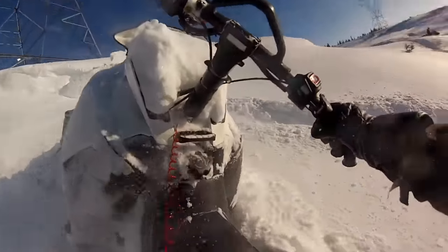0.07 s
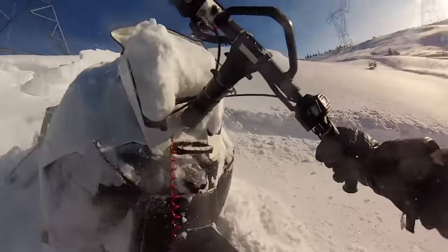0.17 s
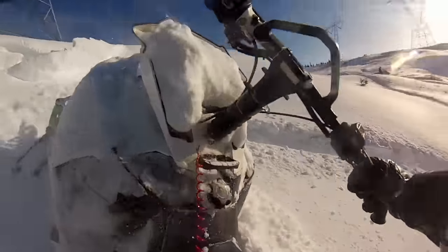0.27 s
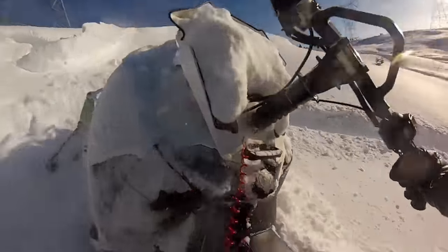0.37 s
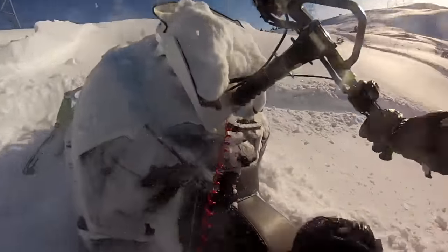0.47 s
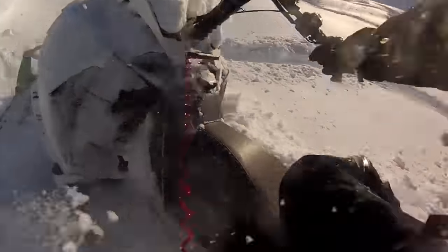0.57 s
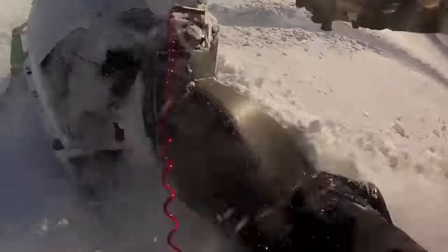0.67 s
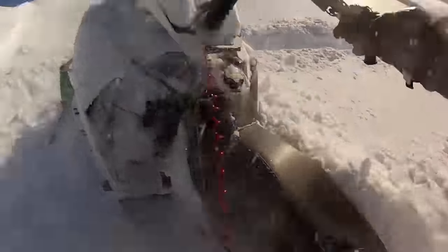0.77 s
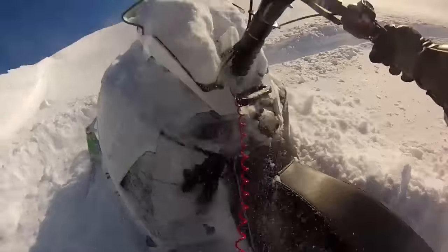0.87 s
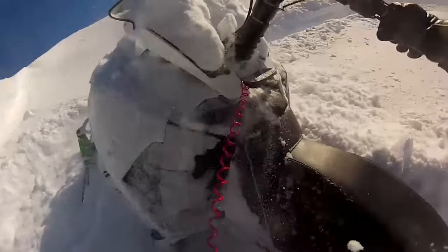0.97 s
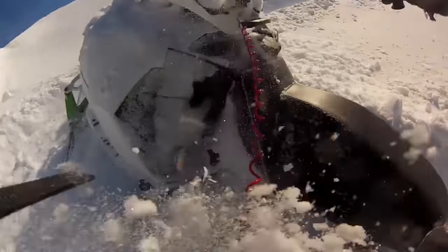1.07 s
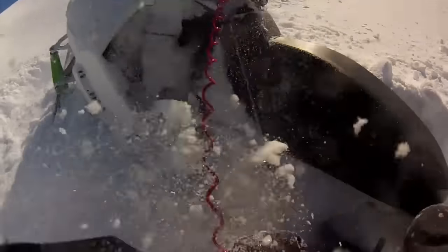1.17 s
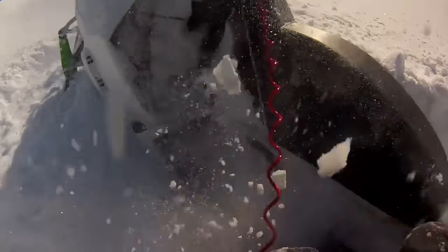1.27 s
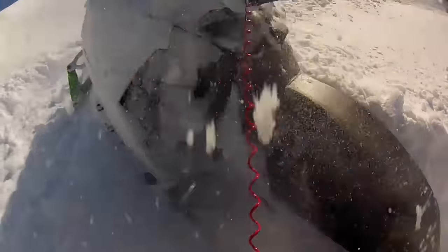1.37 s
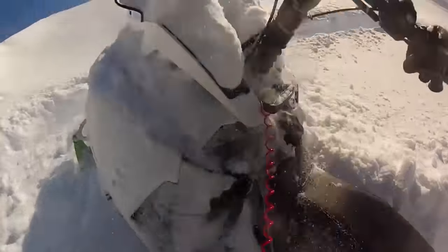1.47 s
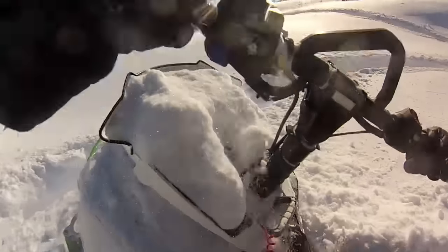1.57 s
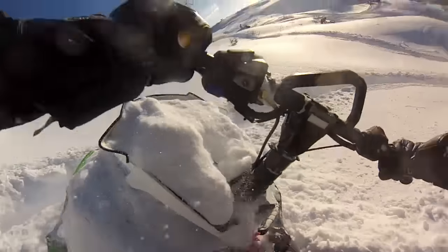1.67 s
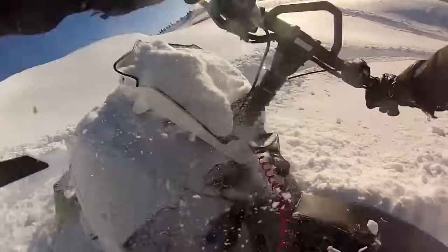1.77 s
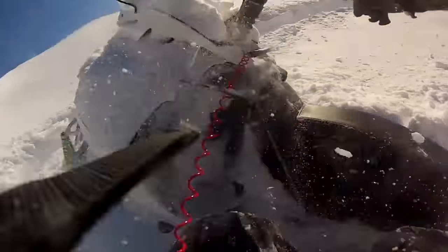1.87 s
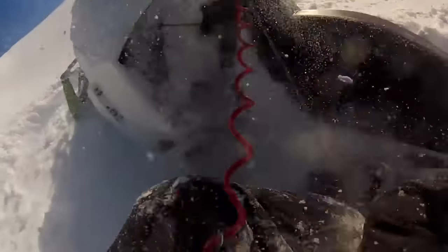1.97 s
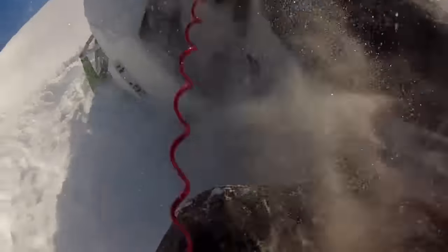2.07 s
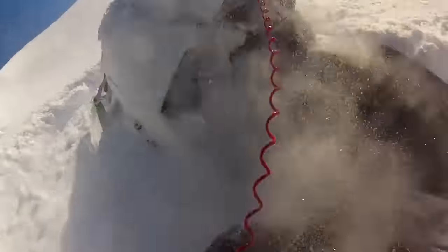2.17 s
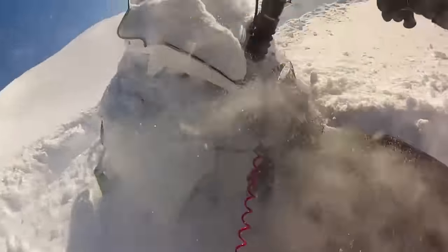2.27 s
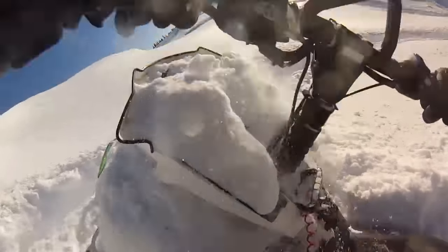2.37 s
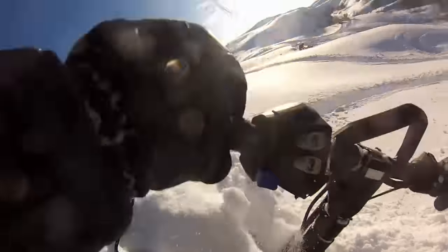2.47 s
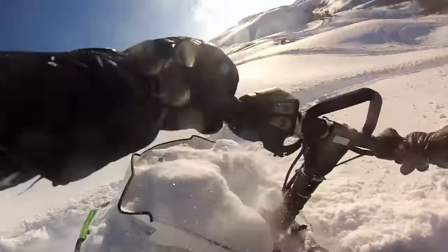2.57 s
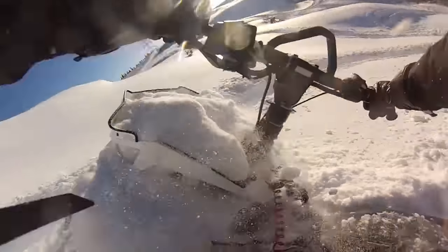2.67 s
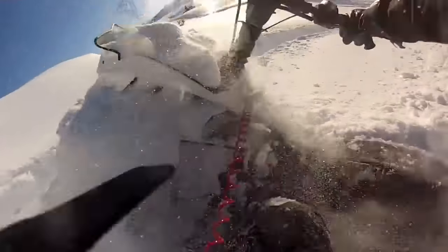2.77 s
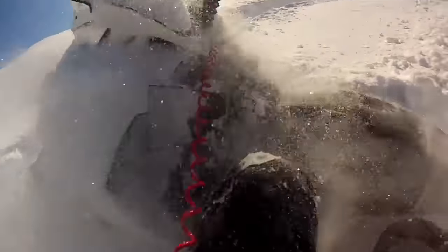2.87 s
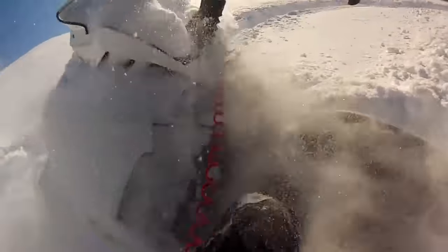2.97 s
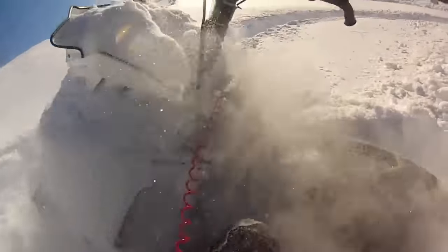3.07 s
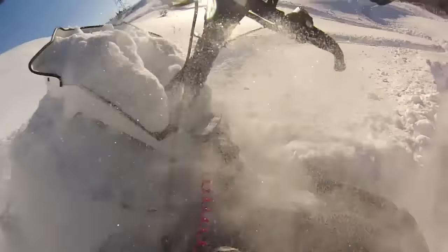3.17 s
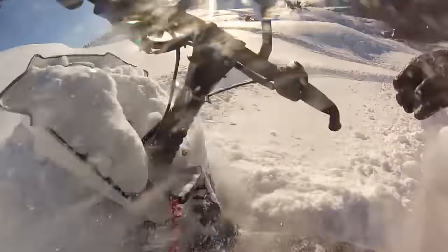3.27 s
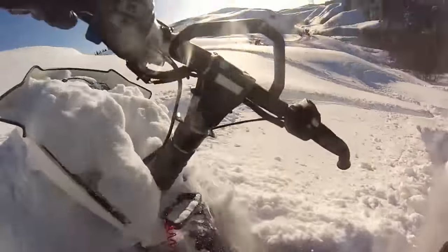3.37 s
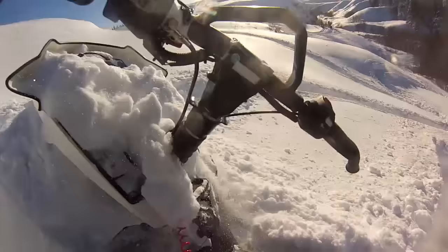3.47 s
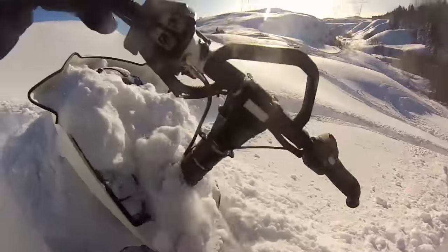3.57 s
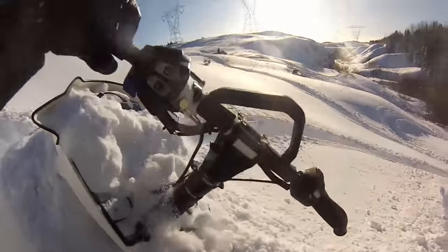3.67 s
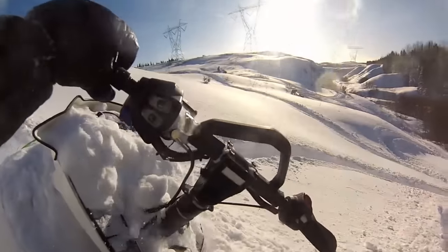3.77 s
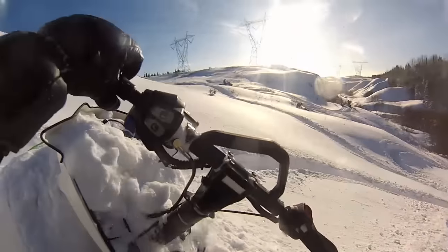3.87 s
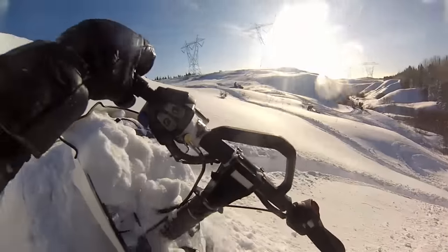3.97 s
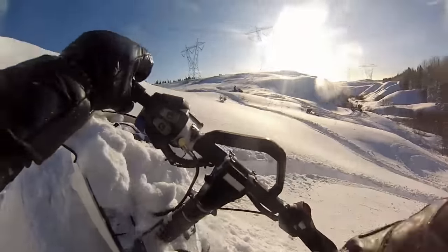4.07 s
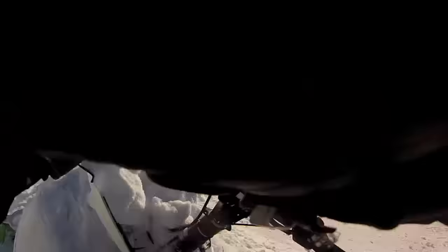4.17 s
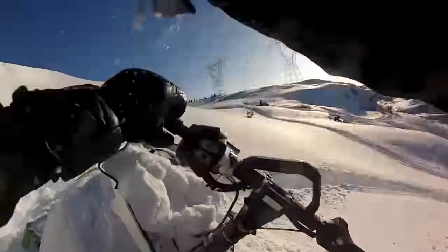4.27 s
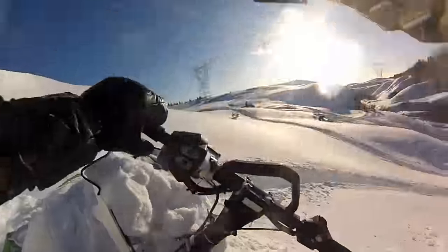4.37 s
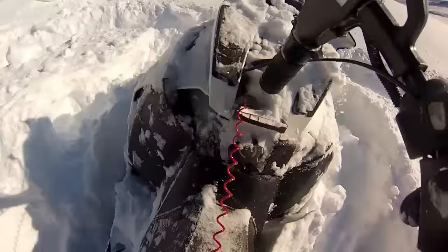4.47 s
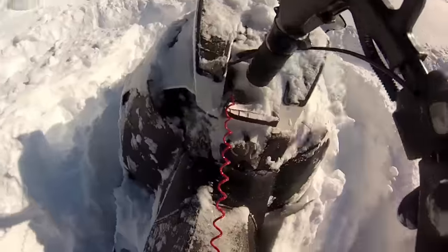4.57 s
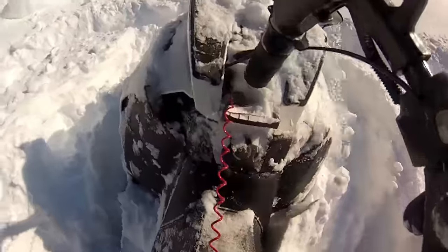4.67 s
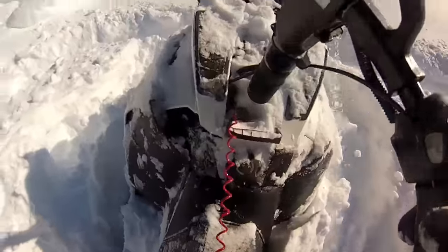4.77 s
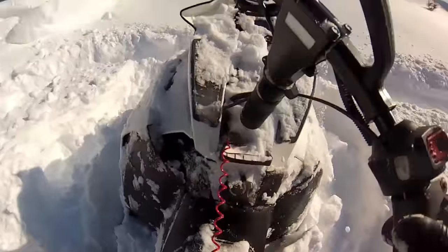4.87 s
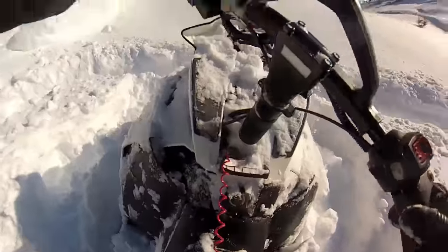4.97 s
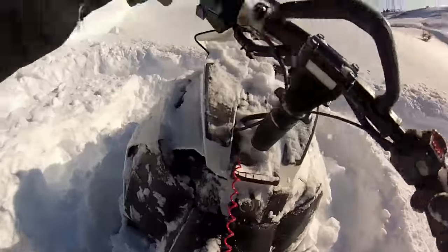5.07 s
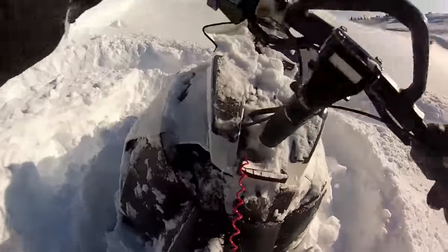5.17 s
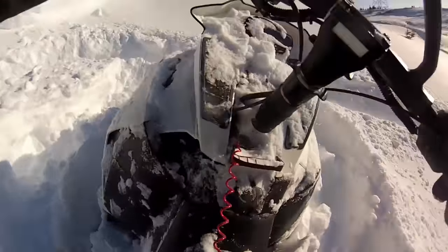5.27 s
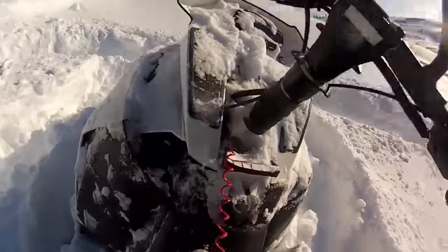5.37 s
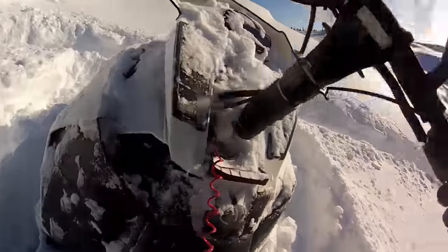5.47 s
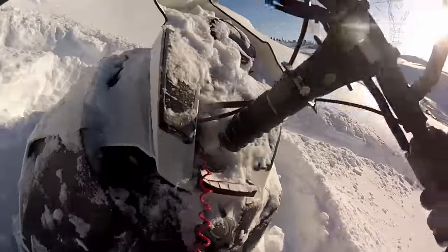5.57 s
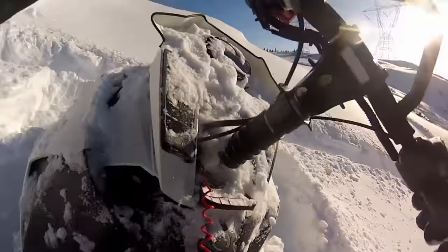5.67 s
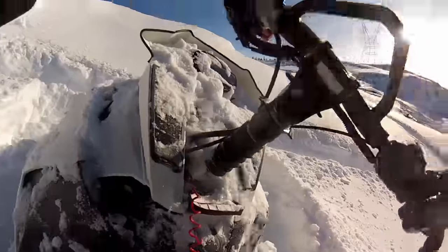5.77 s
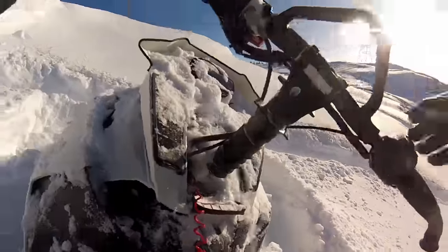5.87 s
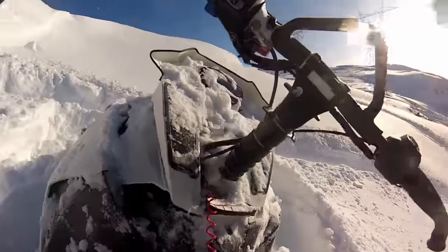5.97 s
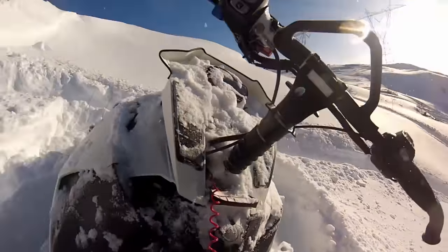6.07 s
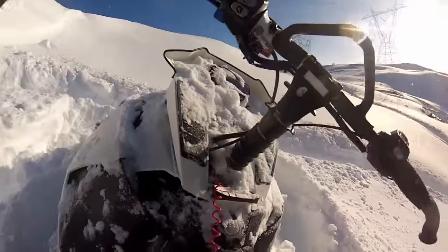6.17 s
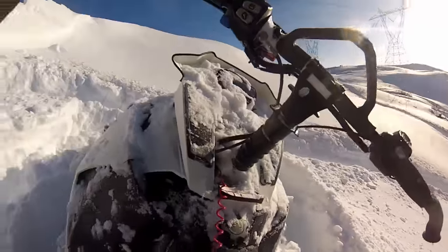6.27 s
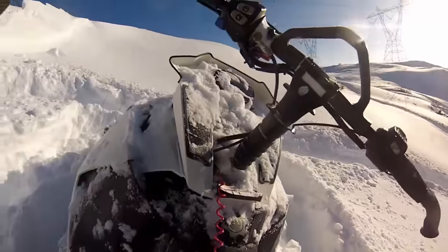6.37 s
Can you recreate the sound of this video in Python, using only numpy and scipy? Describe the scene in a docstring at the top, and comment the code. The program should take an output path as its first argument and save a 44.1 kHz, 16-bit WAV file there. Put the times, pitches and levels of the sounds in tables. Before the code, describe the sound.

Steady high-revving snowmobile whine digs into snow three times amid soft knocks, then drops to slow uneven puttering after a hard bump.

```python
"""Snowmobile digging through deep snow

A twin-cylinder two-stroke bites into deep snow three times at full throttle, then runs down to a rattling idle.
One crank phase drives exhaust tones, panel whine and firing clatter; noise makes the snow, track hiss and wind.
It is heard from a cased camera on the rider: wind buffets it, lumps of snow knock on it,
and one hard bump overloads it and makes its limiter duck."""
import sys
import numpy as np
from scipy import signal
from scipy.fft import rfft, irfft, next_fast_len
from scipy.io import wavfile
from scipy.ndimage import uniform_filter1d, minimum_filter1d

SR = 44100
rng = np.random.default_rng(int(sys.argv[2]) if len(sys.argv) > 2 else 0)


def store_pcm(level_fs):
    """Save levels as 16-bit WAV."""
    pcm = np.round(np.clip(level_fs, -1, 1) * 32767).astype(np.int16)
    wavfile.write(sys.argv[1], SR, np.atleast_2d(pcm).T)


N = 284004

# tone of the driven track, also of the snap of a clack: [f/Hz, relative level/dB]
TRACK_TONE = [(1300, -43), (1900, 5), (2300, 0), (3000, -3), (4100, -8), (4700, -36), (6500, -58)]
# tone of fine snow spray, also of ice ticks: [f/Hz, relative level/dB]
SPRAY_TONE = [(3500, 2), (6200, -3), (9000, -2), (11500, -11.5), (13500, -9.5), (15300, -20.5)]


def from_db(db):
    """Turn decibels into gain."""
    return 10 ** (np.asarray(db) / 20)


def rms_one(x):
    """Scale to rms 1."""
    return x / np.sqrt(np.mean(x ** 2) + 1e-20)


def in_time(*tables):
    """Join curve tables; give one value per sample for each column after the time."""
    s, *columns = np.vstack(tables).T
    return [np.interp(np.arange(N) / SR, s, c) for c in columns]


def drift(rate):
    """Slow random wander with rms 1; the rate in Hz sets how fast it moves."""
    step = 40   # samples between the random points
    r = np.exp(-2 * np.pi * step * rate / SR)
    points = rng.standard_normal(N // step + 2002)
    slow = signal.lfilter([1], [1, -2 * r, r * r], points)[2000:]   # drop the settling of the filter
    return np.interp(np.arange(N) / step, np.arange(len(slow)), rms_one(slow))


def colour(x, spectrum):
    """Shape a sound by its own spectrum and by the resonances of the case; rms 1."""
    # resonances of the camera case: [f/Hz, width/Hz, boost/dB]
    case_modes = [(1620, 334, 9.5), (2276, 400, 5), (3544, 800, 8.5), (5100, 610, 3), (7320, 480, 3.5),
                  (11380, 2800, 8)]
    size = next_fast_len(N)
    hz = np.maximum(np.fft.rfftfreq(size, 1 / SR), 1)
    points_hz, points_db = np.transpose(spectrum)
    level_db = np.interp(np.log(hz), np.log(points_hz), points_db)
    octaves_outside = np.abs(np.log2(hz / np.clip(hz, points_hz[0], points_hz[-1])))
    level_db = level_db - 20 * octaves_outside
    for f, width, db in case_modes:
        level_db = level_db + db / (1 + (2 * (hz - f) / width) ** 2)
    return rms_one(irfft(rfft(x, size) * from_db(level_db), size)[:N])


def resonate(x, hz, width):
    """Two-pole resonance with gain 1 at its peak; width in Hz."""
    r = np.exp(-np.pi * width / SR)
    zeros = np.array([1, 0, -1]) * (1 - r * r) / 2
    poles = [1, -2 * r * np.cos(2 * np.pi * hz / SR), r * r]
    return signal.lfilter(zeros, poles, x + 1e-18)


def noise(flutter_db, rate):
    """White noise whose level flutters."""
    return rng.standard_normal(N) * from_db(flutter_db * drift(rate))


def burst(s, decay):
    """Envelope that jumps to 1 at time s and dies away."""
    age = np.arange(N) / SR - s
    return (age >= 0) * np.exp(-np.clip(age / decay, 0, 50))


def swell(s, length):
    """Smooth rise to 1 and fall, centred on time s."""
    out = np.zeros(N)
    at = np.arange(max(int((s - length / 2) * SR), 0), min(int((s + length / 2) * SR), N))
    out[at] = np.cos(np.pi * (at / SR - s) / length) ** 2
    return out


def ramp_up(s, length):
    """Straight rise from 0 to 1, starting at time s."""
    return np.clip((np.arange(N) / SR - s) / length, 0, 1)


def load():
    """Engine load: 1 under throttle, fading to 0 over a quarter second as it shuts."""
    shut_s, unload_s = 2.91, 0.25
    return 1 - ramp_up(shut_s, unload_s)


def clutch_free():
    """Rises from 0 to 1 as the clutch lets go of the belt."""
    free_s, opening_s = 4.49, 0.025
    return ramp_up(free_s, opening_s)


def bite():
    """How deep the track digs: each dig sets in, holds and lets go."""
    # the track bites into the snow: [start t/s, length t/s, depth 0-1]
    digs = [(1.04, 0.42, 0.76), (1.873, 0.37, 0.92), (2.72, 0.49, 0.51)]
    edge_s = 0.041
    return sum(depth * (ramp_up(s, edge_s) - ramp_up(s + length - edge_s, edge_s)) for s, length, depth in digs)


def by_revs(speed, full_db, halving_db, unloaded_db, least_db):
    """Gain that loses halving_db per halving of the revs and unloaded_db off load, above a floor of least_db."""
    driven = from_db(full_db + halving_db * np.log2(speed / speed[0]) - unloaded_db * (1 - load()))
    return np.hypot(driven, from_db(least_db))


def throb(turns):
    """The driven track jerks once a crank turn, pulsing the gain of spray and whirr."""
    depth = .45
    return 1 + depth * load() * np.cos(2 * np.pi * turns)


def firing_samples(turns):
    """Both cylinders fire once a turn, half a turn apart."""
    return np.flatnonzero(np.diff(np.floor(2 * turns)) > 0)


def firings(turns, uneven_db, length):
    """Two rounded pulses a turn, each of its own strength; levelled to a running rms near 1."""
    at = firing_samples(turns)
    kicks = np.zeros(N)
    kicks[at] = from_db(uneven_db * np.clip(rng.standard_normal(len(at)), -2, 1.5))
    pulses = signal.oaconvolve(kicks, np.hanning(int(length * SR) + 3), "same")
    return pulses / np.sqrt(uniform_filter1d(pulses ** 2, size=SR // 4) + 1e-9)


def orders(turns, multiples, wander_db):
    """Sines on multiples of the crank rate; each swells and fades by chance, the higher ones more."""
    phase = 2 * np.pi * turns
    out = 0
    for k, db in multiples:
        level = from_db(db + wander_db * np.sqrt(k / 2) * drift(2.2))
        out = out + level * np.sin(round(k) * phase + rng.uniform(0, 2 * np.pi))
    return out


def exhaust(turns, speed):
    """The tuned pipe sings at the firing rate under load and falls silent as the revs sink."""
    # low exhaust orders: [multiple of crank rate, relative level/dB]
    pipe_orders = [(1, -13), (2, 2.5), (3, -18), (4, -16.5), (5, -20.5), (6, -17.5), (8, -20)]
    # exhaust note while on the pipe: [t/s, level/dB]
    note_curve = [(0.0, -24.5), (0.48, -22), (0.86, -25), (1.37, -21.5), (1.46, -29), (1.56, -25),
                  (1.71, -28.5), (1.75, -23.5), (1.94, -26), (1.96, -22), (2.18, -24.5), (2.28, -30),
                  (2.46, -23), (2.55, -29.5), (2.92, -22), (3.08, -37), (3.3, -67)]
    on_pipe = np.clip((speed - 78) / 12, 0, 1)
    return on_pipe * from_db(in_time(note_curve)[0]) * rms_one(orders(turns, pipe_orders, wander_db=2.0))


def machinery(turns, speed):
    """Engine block and track: crank harmonics, clatter on every firing, and the clutch ringing at idle."""
    # the rider's body comes between machine and camera: [middle t/s, length t/s, loss level/dB]
    shades = [(0.758, 0.26, 0), (1.725, 0.19, 1), (2.294, 0.2, 0), (2.565, 0.26, 3.5)]
    # clatter of the engine block: [f/Hz, relative level/dB]
    clatter_tone = [(500, -36), (850, -30), (1150, -18), (1400, 5.5), (1800, -9), (2300, -24),
                    (3200, -23.5), (6000, -13.5)]
    # rasp of the biting track: [f/Hz, relative level/dB]
    rasp_tone = [(4000, -4), (4900, 1.5), (5500, 1.5), (6300, -18), (8000, -12)]
    # gliding whirr of the fast-spinning track, rising, then sinking as the throttle shuts:
    # [start t/s, length t/s, from f/Hz, to f/Hz, level/dB before fades]
    track_whirrs = [(1.42, 0.56, 2270, 4105, -37), (2.18, 0.45, 2200, 3310, -37),
                    (2.7, .39, 3400, 4160, -34.5), (3.0, 0.31, 4150, 3490, -42.5)]
    # sinking hiss of the slipping belt in a dig: [start t/s, length t/s, from f/Hz, to f/Hz, level/dB before fades]
    belt_slips = [(1.06, .42, 5430, 4940, -42.5), (1.97, 0.31, 5400, 4950, -40)]

    dig, free = bite(), clutch_free()
    # share of full clatter power: running free, added by a full bite, and returning off load
    rough = np.sqrt(np.clip(0.19 + 0.28 * dig + (1 - load()) ** 3, 0, 1))
    shade = from_db(-sum(db * swell(s, length) for s, length, db in shades))
    overlap = 1.4 + speed / 220   # fast firings run together, slow ones stand apart
    slaps = rng.standard_normal(N) * (overlap + firings(turns, uneven_db=5.5, length=0.02))

    line_gain = by_revs(speed, full_db=-36.5, halving_db=14, unloaded_db=0, least_db=-85)
    lines = whine(turns + .001 * drift(60), speed, line_gain * shade)

    block_gain = by_revs(speed, full_db=-26, halving_db=24, unloaded_db=7, least_db=-53.5)
    block = block_gain * from_db(-5 * free) * colour(slaps, clatter_tone)   # 5 dB less once the clutch is free

    track_gain = by_revs(speed, full_db=-27, halving_db=8.5, unloaded_db=9, least_db=-74)
    settling_db = 1 - ramp_up(0, 2.8)   # the track starts 1 dB louder and settles
    track = track_gain * from_db(settling_db) * colour(slaps, TRACK_TONE)

    rasp_gain = by_revs(speed, full_db=-51.5, halving_db=14.5, unloaded_db=-4.5, least_db=-73.5)
    rasp = rasp_gain * from_db(10.5 * dig) * colour(slaps, rasp_tone)

    whirr = shade * rushes(track_whirrs, width_hz=830)
    slip = rushes(belt_slips, width_hz=590)
    rushing = throb(turns) * (rasp + whirr + slip)
    body = shade * hollow(digging(rough * (block + track)))
    return lines + body + rushing + from_db(-46) * free * clutch(turns)


def whine(turns, speed, gain):
    """Crank orders slide through the resonances of the panels; each flutters, and some sing out for a moment."""
    # how strongly hood and tunnel radiate a crank order: [f/Hz, level/dB]
    panel_curve = [(900, -24), (1150, -19), (1400, -3), (1650, -1.5), (1900, -6.5), (2400, -8.5),
                   (2750, -9.5), (3150, -17.5), (3600, -12.5), (4300, -19)]
    # orders that sing out as the rider moves: [multiple of crank rate, middle t/s, length t/s, level/dB at the top]
    singing_orders = [(10, 1.78, .35, -33), (11, .15, .5, -31), (11, .72, .5, -32), (11, 2.88, .3, -32),
                      (12, 1.79, .26, -28), (12, 2.08, .25, -31), (12, 2.69, .2, -28), (13, .3, .8, -28),
                      (13, .97, .22, -28), (13, 1.27, .32, -27), (13, 2.09, .22, -28), (13, 2.81, .18, -29),
                      (13, 3.07, .2, -35), (14, .3, .95, -24), (14, .93, .3, -24.5), (14, 2.96, .18, -26.5),
                      (14, 3.14, .18, -38), (15, 1.83, .25, -34), (16, 1.39, .2, -31), (17, .3, .7, -31),
                      (17, 1.52, .24, -31), (17, 1.83, .26, -28.5), (17, 2.35, .3, -29.5),
                      (17, 2.75, .28, -28.5), (18, .27, .25, -33), (18, 2.2, .2, -32), (18, 3.15, .14, -37),
                      (19, 1.32, .25, -32), (19, 1.6, .25, -33), (19, 2.05, .42, -26.5),
                      (19, 2.87, .25, -35), (20, 1.63, .35, -35), (20, 2.48, .42, -30.5),
                      (21, 2.46, .3, -35), (27, 2.65, .6, -41), (28, 2.85, .2, -39)]
    hz, db = np.transpose(panel_curve)
    out = 0
    for k in range(9, 37):
        level_db = np.interp(k * speed, hz, db) + 2.5 * drift(3.5)   # slow swelling
        singing = sum(from_db(peak_db) * swell(s, length)
                      for order, s, length, peak_db in singing_orders if order == k)
        level = np.hypot(np.sqrt(2) * gain * from_db(level_db), singing)
        flutter = from_db(2 * drift(30))
        out = out + level * flutter * np.sin(2 * np.pi * (k * turns + rng.random()))
    return out


def digging(x):
    """In a dig, packed snow takes the ring out of the track tunnel; the strained clutch cover howls."""
    # howls of the clutch cover in a deep bite: [middle t/s, length t/s]
    howl_times = [(1.264, 0.23), (2.083, 0.16)]
    tunnel_ring = resonate(x, hz=3550, width=1200)
    howl = 2 * sum(swell(s, length) for s, length in howl_times) * resonate(x, hz=1570, width=54)
    return x + howl - bite() * tunnel_ring


def hollow(x):
    """A hood reflection cancels one band, which slides as the rider moves and slowly fills in again."""
    # sliding hollows: [start t/s, length t/s, from f/Hz, to f/Hz, depth 0-1 at the start]
    hollow_bands = [(0, 1.05, 2850, 2050, .55), (3.05, 1.1, 2520, 2680, .5)]
    width_hz = 670
    lowpass = signal.butter(1, width_hz / 2, fs=SR, output="sos")
    out = x.copy()
    for s, length, from_hz, to_hz, depth in hollow_bands:
        at = np.arange(int(s * SR), int((s + length) * SR))
        carrier = np.exp(2j * np.pi * np.cumsum(np.linspace(from_hz, to_hz, len(at))) / SR)
        band = signal.sosfilt(lowpass, x[at] / carrier)   # shift the band to 0 Hz and isolate it
        fade = np.sqrt(np.linspace(1, 0, len(at)))
        out[at] -= depth * fade * 2 * np.real(band * carrier)
    return out


def rushes(rows, width_hz):
    """Narrow rushes of noise that glide in pitch, fading in and out."""
    out = np.zeros(N)
    lowpass = signal.butter(2, width_hz / 2, fs=SR, output="sos")
    a, b = signal.sosfilt(lowpass, rng.standard_normal((2, N)))
    for s, length, from_hz, to_hz, db in rows:
        at = np.arange(int(s * SR), int((s + length) * SR))
        phase = 2 * np.pi * np.cumsum(np.linspace(from_hz, to_hz, len(at))) / SR
        fade = np.sqrt(np.abs(np.sin(np.linspace(0, np.pi, len(at)))))
        out[at] += from_db(db) * fade * rms_one(a[at] * np.cos(phase) + b[at] * np.sin(phase))
    return out


def clutch(turns):
    """Every firing throws the loose weights against the sheave, a little early or late; running rms near 1."""
    jitter_s, uneven_db = .001, 1.8
    drag = .006   # between blows the weights drag on the sheave and keep it ringing
    at = firing_samples(turns)
    lag, size = rng.standard_normal((len(at), 2)).T
    hits = np.zeros(N)
    hits[np.clip(at + (lag * jitter_s * SR).astype(int), 0, N - 1)] = from_db(uneven_db * size)
    ringing = sheave(hits + drag * rng.standard_normal(N))
    return ringing / np.sqrt(uniform_filter1d(ringing ** 2, size=SR // 4) + 1e-16)


def sheave(hits):
    """The clutch sheave rings in its modes, in a blend that changes from blow to blow."""
    # modes of the sheave: [f/Hz, width/Hz, relative level/dB]
    sheave_modes = [(984, 160, -1.5), (1363, 24, 1), (1494, 44, 8), (1552, 42, 1), (2200, 170, -13),
                    (2740, 180, -7), (3640, 360, -10.5)]
    out = 0
    for hz, width, db in sheave_modes:
        struck = hits * from_db(db + 2 * drift(27))   # blows land on different spots
        ringing = resonate(struck, hz, width)
        out = out + resonate(ringing, hz, 170) / np.sqrt(width)   # a soft contact rounds each blow
    return out


def clacks():
    """Now and then a clutch weight hits its stop hard: a ring of the sheave with a dry snap."""
    # hard clacks: [t/s, strength level/dB]
    clack_hits = [(4.7057, -35), (4.815, -32), (4.9861, -35), (5.0345, -35), (5.0554, -36), (5.0953, -34),
                  (5.416, -35), (5.472, -35), (5.9339, -31), (6.2642, -33)]
    snap_db = -9   # relative to the strength of the clack
    hits = np.zeros(N)
    for s, db in clack_hits:
        hits[int(s * SR)] = from_db(db)
    ringing = sheave(hits)
    snap_level = sum(from_db(db + snap_db) * burst(s, 0.0015) for s, db in clack_hits)
    snap = snap_level * colour(rng.standard_normal(N), TRACK_TONE)
    return hits.max() * ringing / np.abs(ringing).max() + snap


def lugs():
    """The track's lugs drone on the snow at their own rate, which rubs against the exhaust note."""
    # lugs as the track spins up: [t/s, lug rate f/Hz, level/dB]
    lug_curve = [(0, 280, -48), (.2, 305, -42), (.35, 328, -30.5), (.6, 338, -33), (.9, 346, -44),
                 (1.3, 350, -68)]
    per_s, level_db = in_time(lug_curve)
    passed = np.cumsum(per_s * (1 + 0.0047 * drift(7.7))) / SR
    return from_db(level_db) * np.sin(2 * np.pi * passed)


def snow(turns, speed):
    """The track churns the snow and throws up a fine hissing spray, both made of fluttering noise."""
    # loose snow over the camera: [middle t/s, length t/s, spray rise level/dB, churn rise level/dB]
    powder = [(0.634, 0.32, 7, 3), (2.55, 0.36, 4, 2), (3.335, 0.12, 13, 4), (4.404, 1, 0, 6.5),
              (5.5, 0.81, 3, 1)]
    # dull churning: [f/Hz, relative level/dB]
    churn_tone = [(120, 0), (280, 6.5), (400, -0.5), (600, -3.5), (850, -7), (1200, -6), (2000, -11.5)]
    dig = bite()
    # a full bite takes 6.5 dB from the spray and adds 6 dB to the churn
    spray_db = -6.5 * dig + sum(db * swell(s, length) for s, length, db, _ in powder)
    churn_db = 6 * dig + sum(db * swell(s, length) for s, length, _, db in powder)
    spray_gain = by_revs(speed, full_db=-46.5, halving_db=9, unloaded_db=16, least_db=-66.5)
    churn_gain = by_revs(speed, full_db=-32.5, halving_db=7, unloaded_db=3, least_db=-56)
    spray = spray_gain * from_db(spray_db) * colour(noise(flutter_db=1.1, rate=92), SPRAY_TONE)
    churn = churn_gain * from_db(churn_db) * colour(noise(flutter_db=2.5, rate=7.5), churn_tone)
    return throb(turns) * spray + churn


def bump():
    """The rider's arm hits the case: it is shoved in, sways on its mount and rings, and cloth scrapes across it."""
    # shoves on the case: [t/s, push in full scales before filtering, length t/s]
    shoves = [(4.196, -3, 0.0037), (4.209, 1.5, 0.007)]
    # cloth scraping over the case: [t/s, relative level/dB, decay t/s]
    scrapes = [(4.194, -26, 0.0036), (4.2, -3, 0.0022), (4.207, -13.5, 0.0042), (4.215, -4.5, 0.0019)]
    # scraping cloth: [f/Hz, relative level/dB]
    scrape_tone = [(600, -9), (2000, 2), (4000, -5), (8000, 3), (13000, -8), (15000, -12)]
    t = np.arange(N) / SR
    push = sum(size * np.sin(np.pi * np.clip((t - s) / length, 0, 1)) ** 2 for s, size, length in shoves)
    thump = signal.sosfilt(signal.butter(1, [5, 130], "band", fs=SR, output="sos"), push + 1e-18)
    sway = 2.9 * resonate(push, hz=14, width=11)
    scrape_level = sum(from_db(db) * burst(s, decay) for s, db, decay in scrapes)
    scrape = scrape_level * colour(rng.standard_normal(N), scrape_tone)
    ping = 1.3 * resonate(scrape, hz=2170, width=40)
    ring = 2.0 * resonate(scrape, hz=4020, width=570)
    return thump + sway + 0.56 * scrape + ring + ping


def knocks():
    """Soft lumps thud on the case, crust cracks against it, and ice gives short ticks."""
    # snow lumps on the case: [t/s, strength level/dB, thud pitch f/Hz]
    lumps = [(0.443, -4, 480), (0.489, 0, 560), (0.594, -4, 560), (0.617, -6, 600), (0.913, -3, 643),
             (0.984, -8, 400), (1.118, -2, 420), (1.945, -2, 400), (1.958, -2, 340), (1.969, -6, 320),
             (2.003, -2, 369), (2.645, -6, 342), (3.386, -12, 480), (3.726, -22, 320), (4.12, -24, 423),
             (6.327, -16, 280)]
    # what a thud rings with: [multiple of its pitch, width/Hz, level/dB]
    thud_modes = [(.25, 69, 1.5), (.6, 114, 3), (1, 158, -1)]
    # hard crust cracking: [t/s, peak level/dB, pitch f/Hz, decay t/s]
    crust_cracks = [(1.9452, -4, 3800, .0014), (1.9582, -11, 3400, .0015), (1.9695, -11, 1600, .0008),
                    (2.0052, -7, 1600, .0008), (3.386, -19, 1700, .003), (3.727, -24, 1600, .003)]
    # sharp ticks of ice: [t/s, level/dB]
    ice_ticks = [(1.9453, -19), (1.9598, -25), (3.134, -38), (3.3164, -45), (4.6332, -52), (4.698, -49),
                 (5.4104, -51), (6.3273, -47), (6.3533, -52), (6.4271, -47)]
    thuds, grit = np.zeros(N), rng.standard_normal(N)
    for s, db, pitch_hz in lumps:
        contact = from_db(db) * burst(s, 0.0065) * grit
        for ratio, width, mode_db in thud_modes:
            thuds += from_db(mode_db) * resonate(contact, pitch_hz * ratio, width)
    # snow is soft: no sharp edge
    thuds = signal.sosfilt(signal.butter(2, 850, fs=SR, output="sos"), thuds)
    cracks = sum(from_db(db) * crack(grit, s, hz, decay) for s, db, hz, decay in crust_cracks)
    ticks = sum(from_db(db) * burst(s, .0017) for s, db in ice_ticks)
    return thuds + cracks + ticks * colour(rng.standard_normal(N), SPRAY_TONE)


def crack(grit, s, hz, decay):
    """A very brief burst of grit ringing in the case, with a duller body under it; peak 1."""
    # what a crack rings with: [multiple of its pitch, relative level/dB]
    ring_modes = [(.42, -6), (1, 0)]
    contact = burst(s, decay) * grit
    ringing = 0
    for ratio, db in ring_modes:
        centre = hz * ratio
        width = 0.4 * centre
        rung = resonate(resonate(contact, centre, width), centre, width)
        ringing = ringing + from_db(db) / np.sqrt(ratio) * rung
    return ringing / np.abs(ringing).max()


def thumps():
    """The rider's body jolts the mount, and each jolt rocks the camera for a few dull cycles."""
    # jolts of the mount: [t/s, level/dB, pitch f/Hz]
    jolts = [(1.108, -17, 150), (1.776, -17, 100), (1.945, -7, 110), (2.628, -13, 135), (2.75, -15, 125),
             (2.905, -19, 130), (3.404, -20, 140)]
    rise_s = 0.0023   # time to swell; the fall is slower
    out, age = np.zeros(N), np.arange(SR // 8) / SR
    envelope = age / rise_s * np.exp(1 - age / rise_s)
    for s, db, pitch_hz in jolts:
        at = int(s * SR) + np.arange(len(age))
        out[at] += from_db(db) * envelope * np.sin(2 * np.pi * pitch_hz * age)
    return out


def jacket():
    """Stiff cloth rustles in small uneven grains as the rider shifts."""
    # rustles: [middle t/s, length t/s, level/dB]
    rustles = [(4.442, 0.55, -52), (4.677, .16, -54), (5.4, .32, -57), (6.33, 0.15, -64)]
    # stiff cloth: [f/Hz, relative level/dB]
    cloth_tone = [(1700, -2), (2150, 6), (2750, 1), (3600, -12), (5000, -7), (7500, -19), (12000, -25)]
    level = sum(from_db(db) * swell(s, length) for s, length, db in rustles)
    return level * colour(noise(flutter_db=4, rate=90), cloth_tone)


def rumble(turns):
    """Wind buffets the case; at idle the silencer puffs unevenly and the chassis rocks once a turn."""
    # gusts as the rider heaves about, lulls if negative:
    # [middle t/s, length t/s, wind rise level/dB, buffeting rise level/dB]
    gusts = [(0.164, 0.13, 2.5, 0), (0.374, 0.26, 5, 2), (0.616, 0.19, 6, 10.5), (0.74, 0.2, -17, 4.5),
             (0.915, 0.23, 5, 8.5), (1.132, 0.24, 2, 11), (1.222, 0.24, 9, 2.5), (1.575, 0.29, 7.5, 4.5),
             (1.737, 0.11, -2, -18), (1.994, 0.17, 3, 9), (2.236, 0.15, 12.5, 2), (2.545, 0.35, 1, 2),
             (2.13, .14, -12, 8), (2.908, 0.23, 4, -25), (3.544, 0.15, 7, 5), (3.912, 0.29, -4, -1),
             (4.112, 0.18, 5, 8), (4.67, 0.1, 5.5, -4), (5.015, 0.13, 7, -3), (5.16, 0.3, -35, -7),
             (5.393, 0.14, 1, 5.5), (6.087, 0.074, 7, 15), (6.26, 0.33, 4.5, -1)]
    # puffs of the silencer: [f/Hz, relative level/dB]
    puff_tone = [(40, 0.5), (80, -2.5), (110, 5), (150, -0.5), (220, -44), (450, -36), (750, -25),
                 (1100, -27.5)]
    # buffeting: [f/Hz, relative level/dB]
    buffet_tone = [(35, -16), (75, 1), (130, -0.5), (180, -3.5), (260, -10.5), (450, -38), (1000, -49)]
    # deep wind: [f/Hz, relative level/dB]
    wind_tone = [(8, -35), (18, 6.5), (28, -7.5), (45, -6.5), (70, -17), (150, -37), (500, -88)]
    driving, idling = load(), clutch_free()
    # each pair of levels: driving, at rest
    wind_db = np.interp(-driving, [-1, 0], (-22.5, -29.5))
    buffet_db = np.interp(-driving, [-1, 0], (-34.5, -42.5))
    wind_db = wind_db + sum(db * swell(s, length) for s, length, db, _ in gusts)
    buffet_db = buffet_db + sum(db * swell(s, length) for s, length, _, db in gusts)
    breath = 1 + 9 * rng.standard_normal(N)
    puffs = colour(firings(turns, uneven_db=2.5, length=0.0082) * breath * idling, puff_tone)
    rocking = from_db(-32.5) * idling * np.sin(2 * np.pi * turns)
    buffet = from_db(buffet_db) * colour(noise(flutter_db=2.0, rate=24), buffet_tone)
    wind = from_db(wind_db) * colour(noise(flutter_db=1.3, rate=36), wind_tone)
    return from_db(-42) * puffs + rocking + buffet + wind


def scene():
    """Mix the machine, driven by one crank phase, with the snow, the wind and the touches on the camera."""
    # crank under throttle: [t/s, turn rate f/Hz]
    throttle_revs = [(0.0, 127.7), (0.45, 127.6), (0.8, 126.8), (1.13, 128.6), (1.3, 125.7), (1.48, 124.5),
                     (1.69, 126.4), (1.92, 127.2), (2.2, 123.9), (2.45, 127.1), (2.87, 126.5), (3.0, 120.5)]
    # crank with the throttle shut: [t/s, turn rate f/Hz]
    run_down_revs = [(3.1, 105), (3.15, 97.3), (3.2, 92), (3.35, 80), (3.7, 60), (4.0, 44.5), (4.3, 28.2),
                     (4.55, 23), (4.98, 23), (5.17, 25.4), (5.5, 26), (6.3, 25.8)]
    speed, = in_time(throttle_revs, run_down_revs)
    unsteady = .001 + .015 * np.clip(1 - speed / 90, 0, 1)   # a two-stroke stumbles at low revs
    turns = np.cumsum(speed * (1 + unsteady * drift(25))) / SR
    machine = exhaust(turns, speed) + machinery(turns, speed) + clacks() + lugs()
    touches = bump() + knocks() + thumps() + jacket()
    return (machine + snow(turns, speed) + touches + rumble(turns))[None]


def limiter(x, threshold_db, hold, release_db_per_s, attack):
    """Peaks over the threshold pull the gain down; it is held, then let go at a steady rate in dB."""
    over = np.maximum(20 * np.log10(np.abs(x) + 1e-9) - threshold_db, 0)
    size = int(hold * SR) // 2 * 2 + 1
    held = -minimum_filter1d(-over, size, origin=size // 2, mode="constant")
    ramp = release_db_per_s * np.arange(N) / SR
    cut_db = np.maximum.accumulate(held + ramp) - ramp
    pole = np.exp(-1 / (attack * SR))   # smooths the onset and the release
    return x * from_db(-signal.lfilter([1 - pole], [1, -pole], cut_db))


def record(dry):
    """The camera limits, clips what still overloads, and cuts the top above 15.4 kHz."""
    limited = limiter(dry[0], threshold_db=-0.5, hold=0.098, release_db_per_s=283, attack=0.0021)
    clipped = np.clip(limited, -1, 1)
    return signal.sosfilt(signal.ellip(10, .1, 80, 15400, fs=SR, output="sos"), clipped)[None]


dry = scene()
out = record(dry)
store_pcm(out)
```